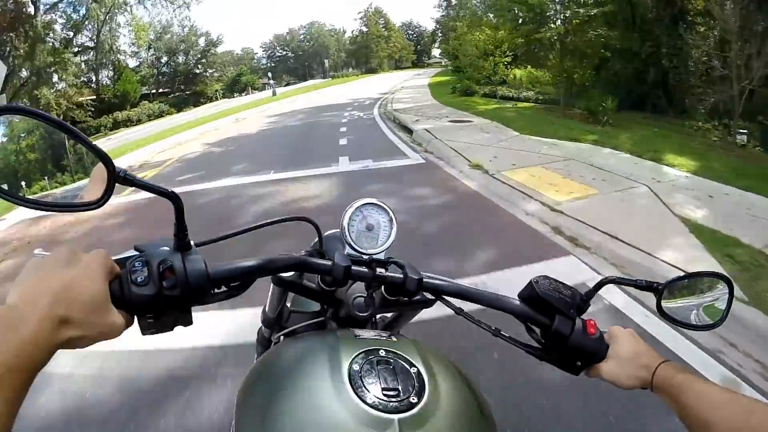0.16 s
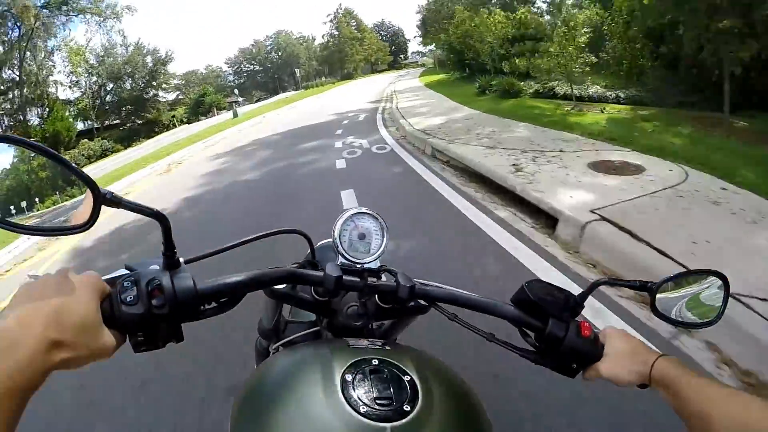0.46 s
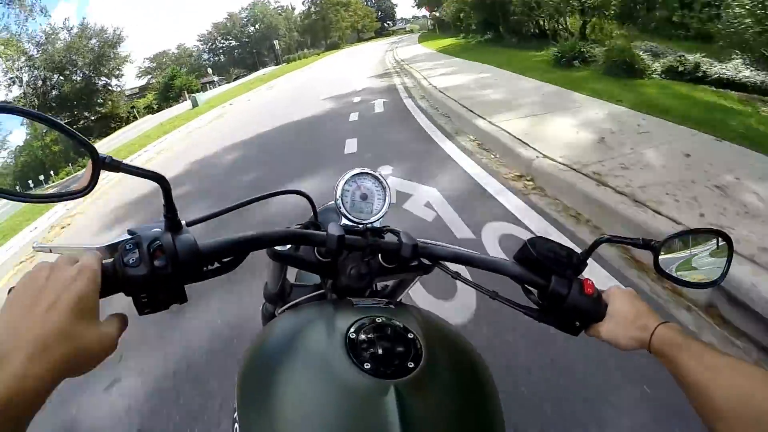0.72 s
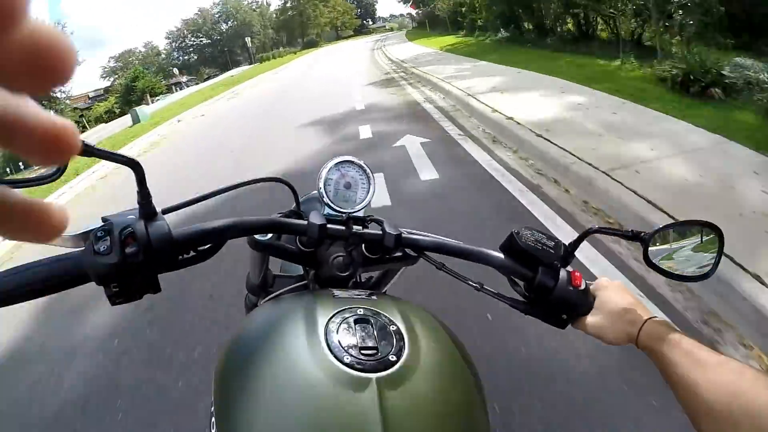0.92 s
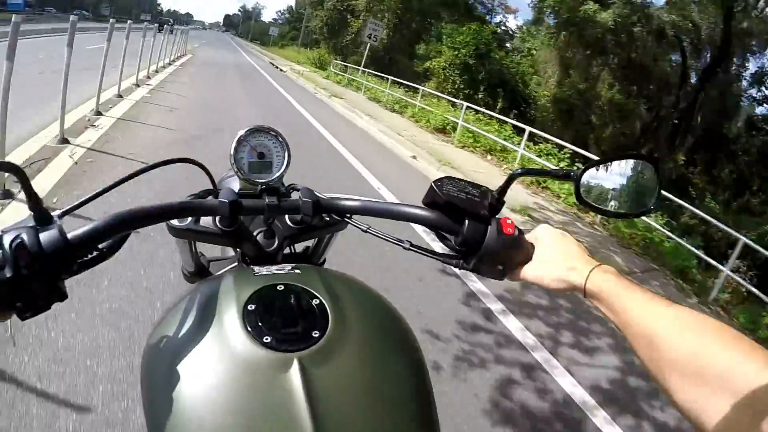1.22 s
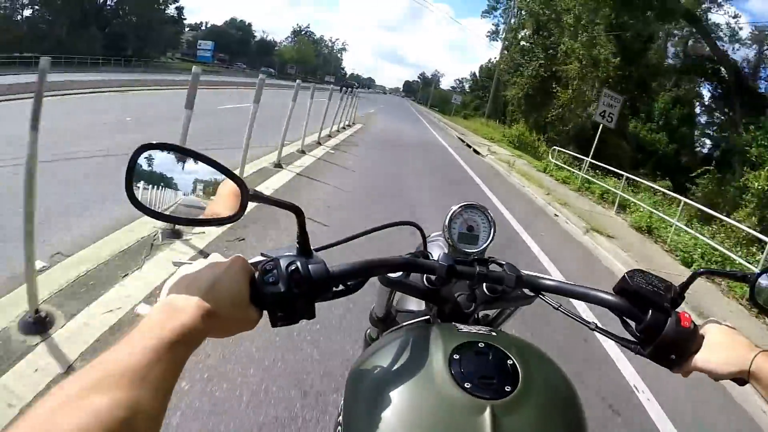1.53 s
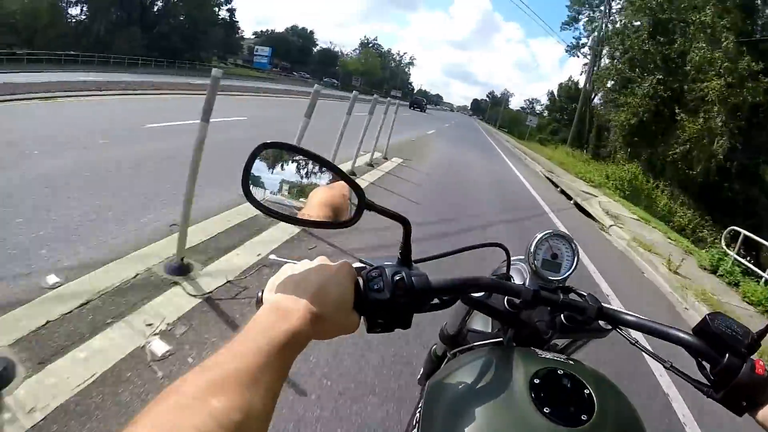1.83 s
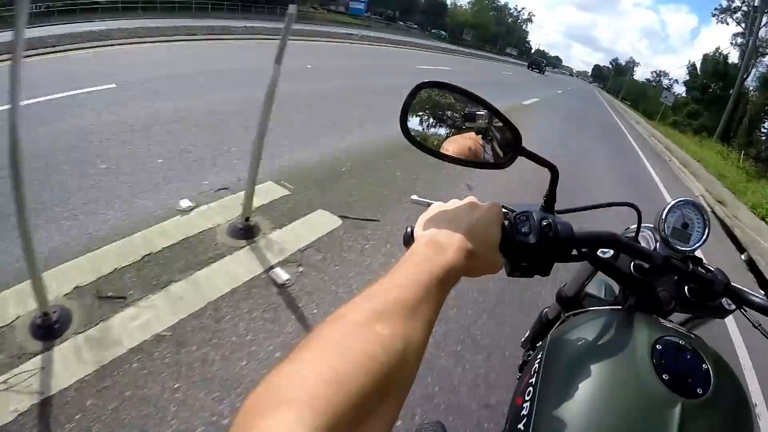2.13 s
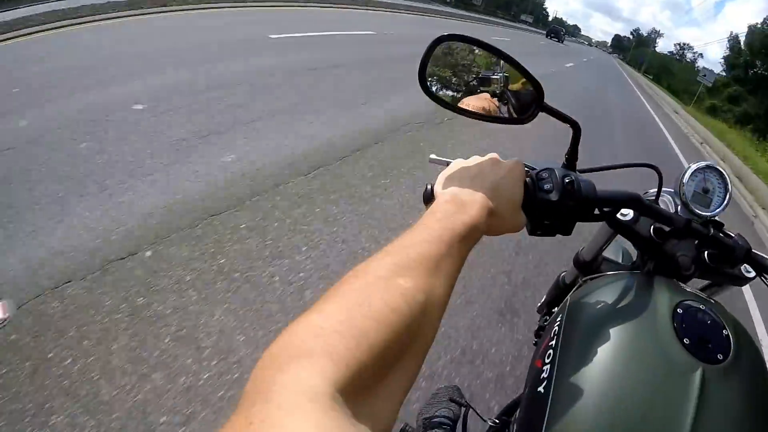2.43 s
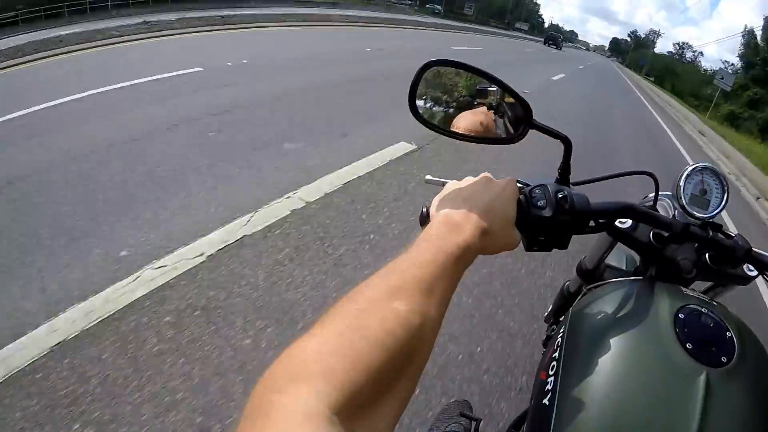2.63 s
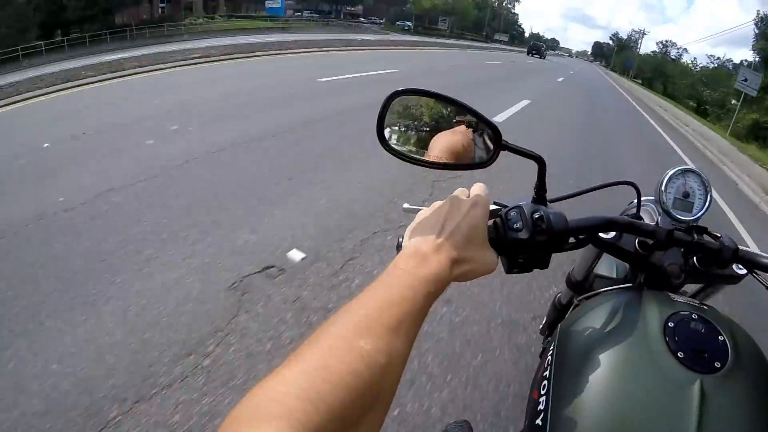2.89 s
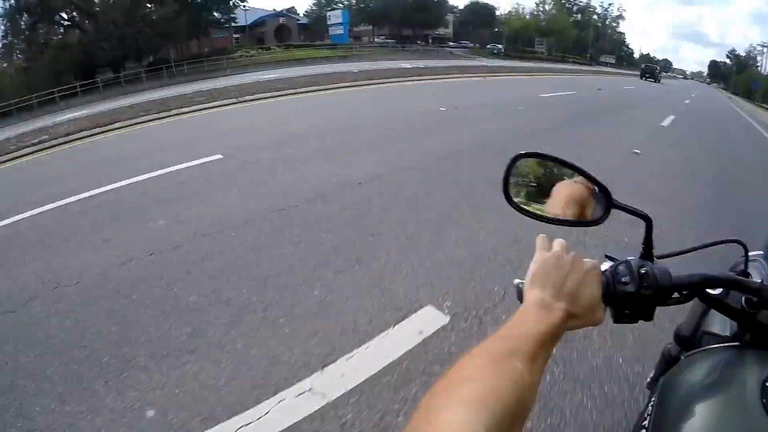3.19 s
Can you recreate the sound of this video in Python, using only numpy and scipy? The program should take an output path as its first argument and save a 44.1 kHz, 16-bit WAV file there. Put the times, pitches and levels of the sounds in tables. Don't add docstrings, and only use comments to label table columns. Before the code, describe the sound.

Close onboard motorcycle engine, lumpy two-cylinder beat easing off, then an abrupt jump to hard acceleration with climbing pitch and gas hiss; at the end the pitch drops and the gearbox knocks. Outdoor road, light wind rumble.

```python
import sys
import numpy as np
from scipy import signal
from scipy.fft import rfft, irfft
from scipy.io import wavfile

SR = 44100
rng = np.random.default_rng(int(sys.argv[2]) if len(sys.argv) > 2 else 0)


def natural_amplitude(level_db):
    exponent = np.asarray(level_db, float) / 20
    return 10 ** exponent


def to_wav(sig):
    pcm = np.clip(np.atleast_2d(sig), -1, 1) * 32767
    pcm = np.round(pcm).astype(np.int16)
    wavfile.write(sys.argv[1], SR, pcm.T)


N = 147735
TOP_HZ = 37


def read(points, hz):
    f, v = np.transpose(points)
    return np.interp(np.log(hz + 1), np.log(f + 1), v)


def noise(points):
    spectrum = rfft(rng.standard_normal(N)) * natural_amplitude(read(points, np.fft.rfftfreq(N, 1 / SR)))
    x = irfft(spectrum, N)
    return x / x.std()


def band(hz, width):
    return noise([(hz - 2 * width, -40), (hz - width / 2, -3), (hz + width / 2, -3),
                  (hz + 2 * width, -40), (2 * hz, -90)])


def add(mix, s, sound):
    part = mix[max(round(s * SR), 0):][:len(sound)]
    part += sound[:len(part)]


def swell(t, tau):
    u = np.maximum(t, 0) / tau
    return u ** 2 * np.exp(2 - u) / 4


# time in seconds, engine load from 0 to
# 1, exhaust level in dB.
THROTTLE = [(0, 0.4, 0), (.3, 0.16, -1), (.55, 0, -3.5), (.75, 0, -2), (1.14, 0.13, -1.5),
            (1.155, 0.52, -2), (1.5, 0.55, -.5), (1.9, 0.58, 0), (2.0, 0.93, -2.5), (2.4, 0.95, -2.5),
            (2.8, 0.95, -5), (3.12, 0.93, -5), (3.165, 0.04, -5.5), (3.35, 0.12, -5.5)]


def load(s, axis=1):
    return np.interp(s, np.transpose(THROTTLE)[0], np.transpose(THROTTLE)[axis])


def by_load(a, three):
    return np.interp(a, (.1, .55, 1), three)


# time in seconds, engine cycles a second in Hz.
CRUISE_SPEED = [(0, 21.061), (.15, 21.807), (.4, 22.232), (.8, 22.386), (1.15, 22.492)]
# time in seconds, cycles in Hz.
PULL_SPEED = [(1.15, 27.178), (1.5, 29.243), (1.85, 31.06), (2, 32.586), (2.3, 35.272), (2.7, 38.52),
              (3, 40.751), (3.12, 41.26), (3.17, 39.2), (3.25, 37.3), (3.35, 34)]


def crank():
    start_turn = (-.508, -.527)
    shut_s, shut_lag_s = 3.15, .0056
    t = np.arange(N) / SR
    turns, hz = np.zeros(N), np.zeros(N)
    for speed, first in zip((CRUISE_SPEED, PULL_SPEED), start_turn):
        on = t >= speed[0][0]
        hz[on] = np.interp(t[on], *np.transpose(speed))
        turns[on] = np.ceil(turns.max()) + 2 + first + np.cumsum(hz[on]) / SR
    return turns - hz * shut_lag_s * (t > shut_s), hz


def firings(turns):
    rear_turn = (.419, .426, .476)
    t = np.arange(N) / SR
    rows = []
    for cyl in range(2):
        place = np.maximum.accumulate(turns - cyl * by_load(load(t), rear_turn))
        new_cycle = (np.diff(np.floor(place)) > 0) & (np.diff(place) < .1)
        for s in np.flatnonzero(new_cycle) / SR:
            if not 1.135 < s < 1.165:
                rows.append((s, cyl))
    return sorted(rows)


# Hz with the throttle shut, half open, wide open.
THUMP_PITCH = [
    (291, 313, 370),
    (215, 182, 161),
]
# milliseconds shut, half open, wide open.
THUMP_RING = [
    (1.25, 0.89, 0.75),
    (1.5, 1.56, 1.34),
]


def thump(out, s, cyl, a, level_db):
    late_ms, suction = 0.26, 0.18
    sag = (5, 21.2)[cyl] / 1000
    t = np.arange(1300) / SR
    f, tau = by_load(a, THUMP_PITCH[cyl]), by_load(a, THUMP_RING[cyl]) / 1000
    wave = np.sin(2 * np.pi * f * sag * np.log1p(t / sag)) - suction
    to_trough = sag * np.expm1(.75 / (f * sag))
    add(out, s + late_ms / 1000 - to_trough, natural_amplitude(level_db) * swell(t, tau) * wave)


# milliseconds shut, half open, wide open.
ECHO_DELAY = [
    (9.5, 5.6, 4.1),
    (9.5, 5.0, 4.0),
]
# dB shut, half open, wide open.
ECHO_LEVEL = [
    (-8.5, -27, -8.5),
    (-10, -6.5, -6.5),
]


def pipe_echo(out, s, cyl, a, level_db):
    echo_hz, ring_ms, suction = (116.6, 176, 173), (3.68, 1.53, 1.95), 0.28
    t = np.arange(1300) / SR
    pulling = s > 1.15
    heat = max(a, .55) * pulling
    f = by_load(heat, echo_hz)
    echo_db = level_db + by_load(a * pulling, ECHO_LEVEL[cyl])
    wave = np.sin(2 * np.pi * f * t) - suction
    start = s + by_load(heat, ECHO_DELAY[cyl]) / 1000 - .75 / f
    add(out, start, natural_amplitude(echo_db) * swell(t, by_load(heat, ring_ms) / 1000) * wave)


# pitch in Hz, width in Hz (wider dies sooner), level in dB.
RASP_TONES = [(388, 106, -6), (554, 98, 3.5), (723, 154, 3.5), (829, 50, -6), (1025, 166, 5.5),
              (1187, 163, -9), (1786, 155, -2.5), (2500, 165, -11), (3020, 180, -9), (3525, 200, -10)]


def rasp(out, s, cyl, a, hz, luck):
    full_db, range_db, rear_db = -5, 22.5, -6.5
    lead_ms, rise_ms, damp = 4.6, 1.6, 0.78
    detune, spread_db = .004, .9
    t = np.arange(1300) / SR
    hot = (hz[round(s * SR)] / TOP_HZ) ** .3
    ring = 0
    for k, (f, width, db) in enumerate(RASP_TONES):
        fade = natural_amplitude(db + spread_db * luck[3 + k]) * np.exp(-np.pi * width * damp * t)
        ring = ring + fade * np.sin(2 * np.pi * f * hot * (1 + detune * luck[13 + k]) * t)
    rasp_db = full_db + range_db * (a - 1) + cyl * rear_db
    add(out, s - lead_ms / 1000, natural_amplitude(rasp_db) * ring * (1 - np.exp(-t * 1000 / rise_ms)))


# frequency in Hz, level in dB per Hz.
GAS_COLOUR = [(400, -26), (750, -20), (1160, -15), (2040, -11), (3300, -16), (4300, -22), (9800, -29),
              (11000, -40), (15200, -44)]


def gas_hiss(gate):
    gas_db, steady = (-45, -33, -30), 0.37
    howl_db, howl_range_db = -23.5, 24
    a = load(np.arange(N) / SR)
    tones = sum(natural_amplitude(db) * band(f, width) for f, width, db in RASP_TONES[6:])
    howl = natural_amplitude(howl_db + howl_range_db * (a - 1.5)) * tones
    hiss = natural_amplitude(by_load(a, gas_db)) * noise([(250, -66)] + GAS_COLOUR)
    return (gate + steady) * (howl + hiss)


# dB shut, half open, wide open.
CYLINDER_LEVEL = [
    (-2.6, -0.81, -3.8),
    (-0.84, -2, 0.44),
]


def exhaust(turns, hz):
    jitter_ms, spread_db = 0.028, 0.6
    puff_lead_ms, puff_ms, puff_spread_db = 5.25, 3.1, 2.5
    out, gate, t = np.zeros(N), np.zeros(N), np.arange(1300) / SR
    for (s, cyl), luck in zip(firings(turns), rng.standard_normal((400, 24))):
        a = load(s)
        s = s + luck[0] * jitter_ms / 1000
        level_db = load(s, axis=2) + by_load(a, CYLINDER_LEVEL[cyl]) + spread_db * luck[1]
        thump(out, s, cyl, a, level_db)
        pipe_echo(out, s, cyl, a, level_db + spread_db * luck[2])
        rasp(out, s, cyl, a, hz, luck)
        puff = natural_amplitude(puff_spread_db * luck[23]) * swell(t, puff_ms / 2000)
        add(gate, s - puff_lead_ms / 1000, puff)
    return out + gas_hiss(gate)


def intake(turns):
    throb_db, range_db, throb_turn = -13, 41, .35
    a = load(np.arange(N) / SR)
    return natural_amplitude(throb_db + range_db * (a - 1)) * np.cos(4 * np.pi * turns + 2 * np.pi * throb_turn)


# frequency in Hz, level in dB per Hz.
FIZZ_COLOUR = [(300, -9), (600, -11.5), (1050, -18), (1430, -27), (3710, -32.5), (4820, -40), (9900, -38),
               (11000, -50)]
# pitch in Hz, width in Hz, level in dB.
WHINE_TONES = [(5270, 230, -52), (7100, 660, -71), (9100, 390, -50), (12700, 600, -63)]


def valve_train(hz):
    fizz_db, load_range_db = -24.5, 3.5
    fizz_speed_db, whine_speed_db = 5.5, 10.5
    a, octaves = load(np.arange(N) / SR), np.log2(hz / TOP_HZ)
    whines = sum(natural_amplitude(db) * band(f, width) for f, width, db in WHINE_TONES)
    whines = whines + natural_amplitude(-63) * noise([(3000, -30), (4500, 17), (10000, -20), (15200, -5)])
    fizz = natural_amplitude(fizz_db + fizz_speed_db * octaves) * noise([(150, -14)] + FIZZ_COLOUR)
    return natural_amplitude(load_range_db * (a - 1)) * (fizz + natural_amplitude(whine_speed_db * octaves) * whines)


# frequency in Hz, level in dB per Hz.
WIND_COLOUR = [(15, -5), (35, -2.5), (55, -6), (100, -7), (250, -14), (600, -49)]


def wind(hz):
    wind_db, speed_db, gust_db = -23.5, 9.5, 2.5
    gust = noise([(.5, 0), (4, -3), (15, -12), (40, -50)])
    level_db = wind_db + speed_db * np.log2(hz / TOP_HZ) + gust_db * gust
    return natural_amplitude(level_db) * noise([(5, -40)] + WIND_COLOUR + [(3000, -140)])


# time in seconds, click level in dB, thud level in dB.
SHIFT_KNOCKS = [
    (3.2155, -15, -10.5),
    (3.233, -25, -15),
    (3.160, -32, -8.5),
]


def gearbox():
    click_ms, click_hz, thud_hz, thud_ms = 1.7, (1500, 8000), 106.6, 6.7
    out, t = np.zeros(N), np.arange(2500) / SR
    for s, click_db, thud_db in SHIFT_KNOCKS:
        b, a = signal.butter(2, click_hz, "band", fs=SR)
        grit = signal.lfilter(b, a, rng.standard_normal(2500))
        add(out, s, natural_amplitude(click_db) * grit * np.exp(-t * 1000 / click_ms))
        thud = swell(t, thud_ms / 1000) * np.sin(2 * np.pi * thud_hz * t)
        add(out, s - thud_ms / 1000, natural_amplitude(thud_db) * thud)
    return out


def scene():
    turns, hz = crank()
    mix = exhaust(turns, hz) + intake(turns) + valve_train(hz) + wind(hz) + gearbox()
    return mix[None]


def band_limit(x):
    return signal.sosfilt(signal.butter(12, 15380, fs=SR, output="sos"), x)


def record(dry):
    clear = signal.sosfilt(signal.butter(2, 18, "high", fs=SR, output="sos"), dry)
    limited = 1.343 * np.tanh(clear / 1.287)
    return band_limit(limited)


dry = scene()
out = record(dry)
to_wav(out)
```